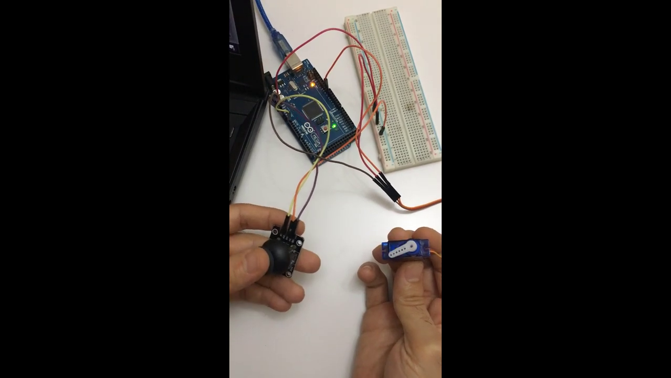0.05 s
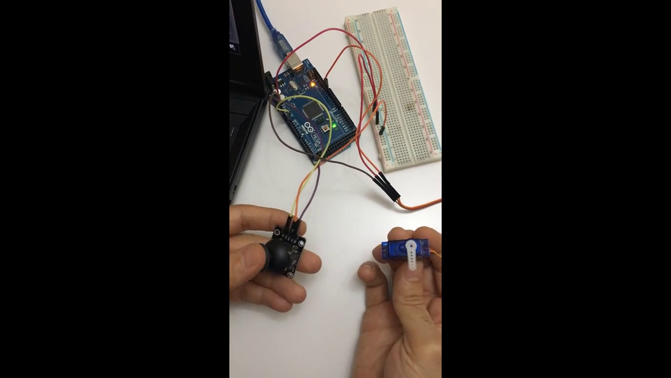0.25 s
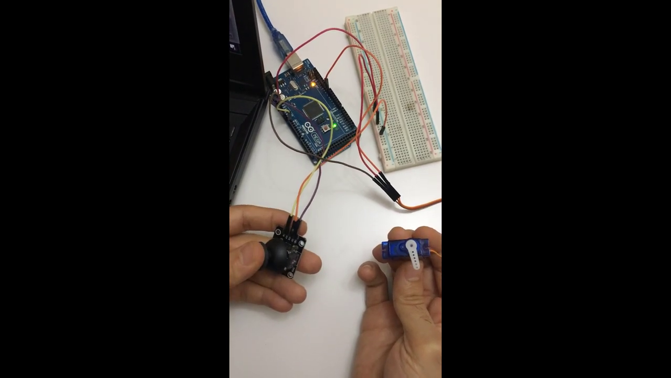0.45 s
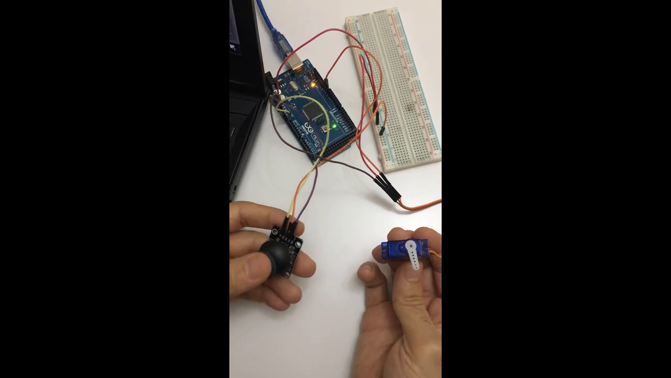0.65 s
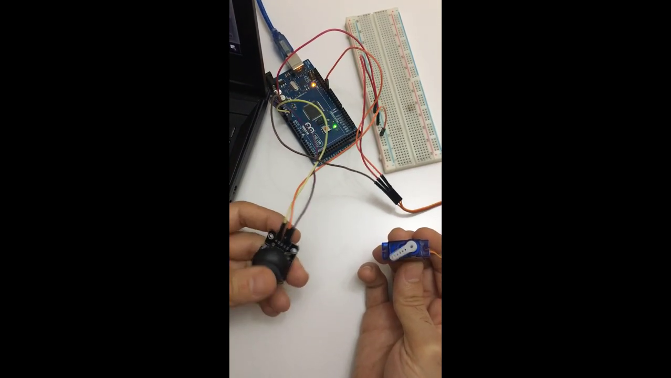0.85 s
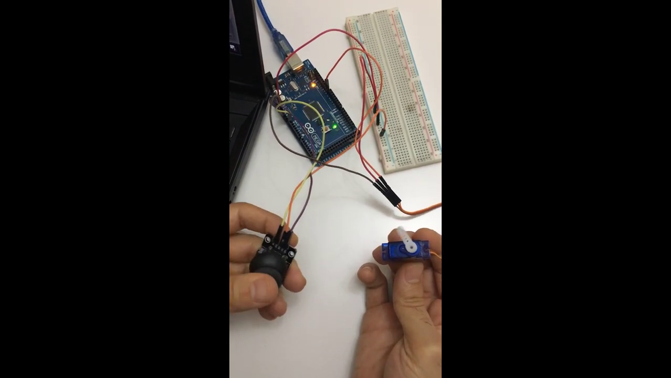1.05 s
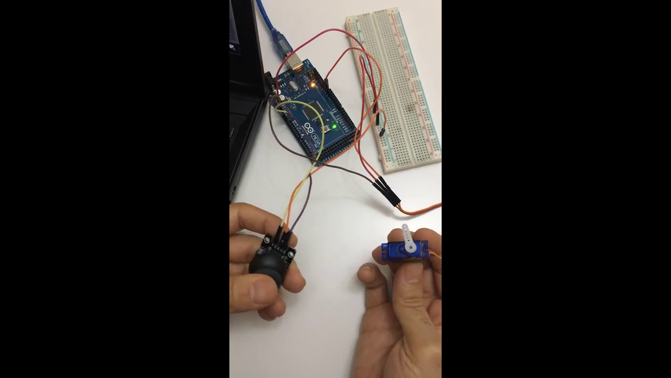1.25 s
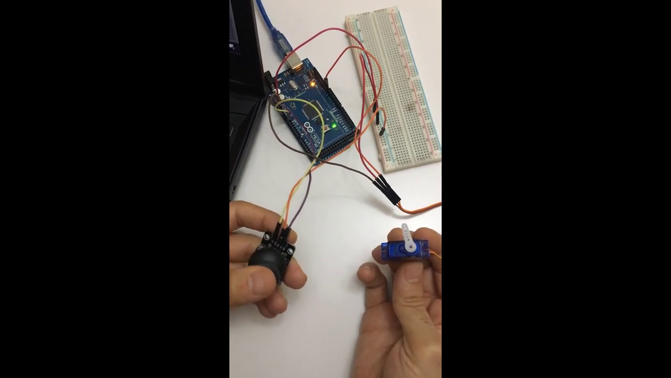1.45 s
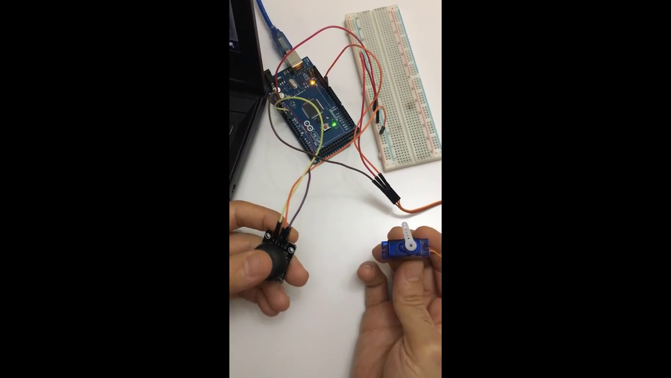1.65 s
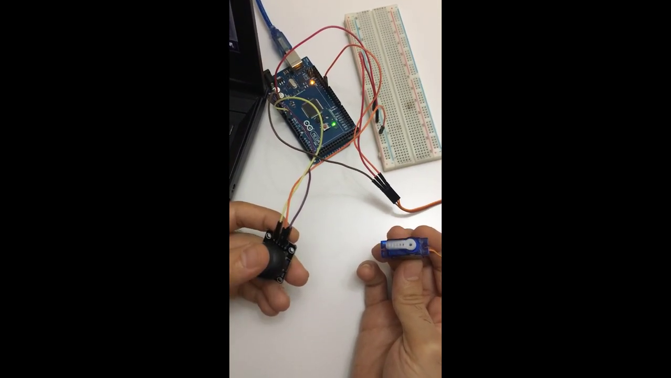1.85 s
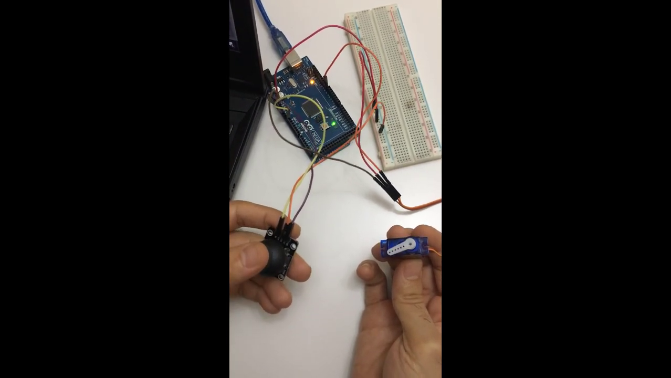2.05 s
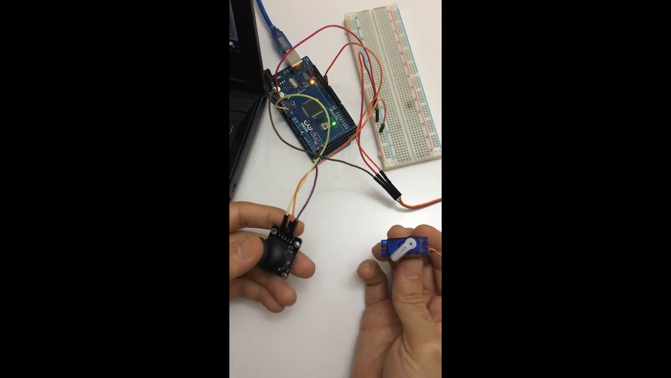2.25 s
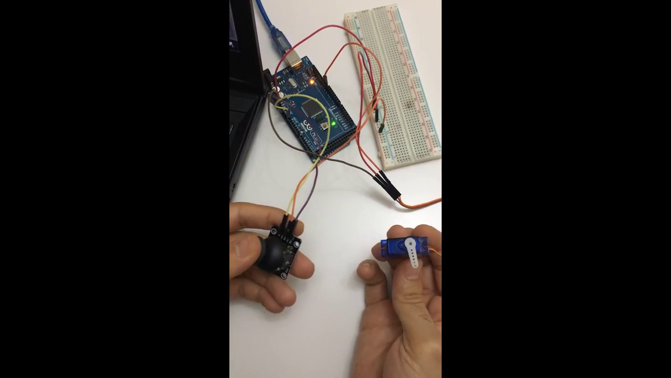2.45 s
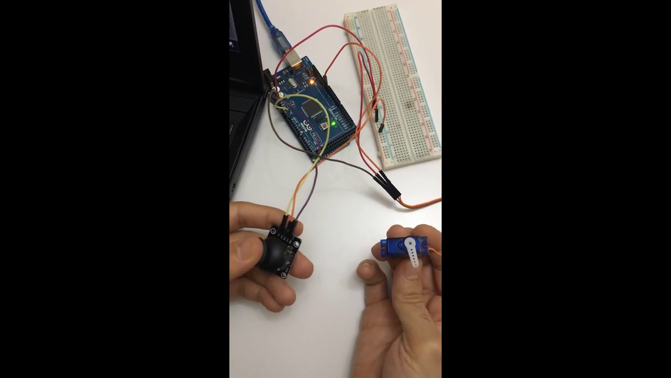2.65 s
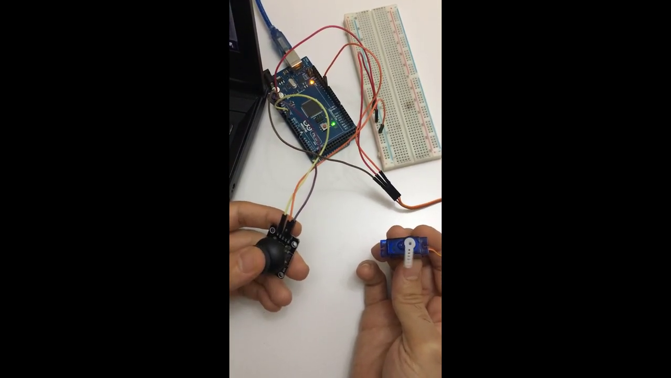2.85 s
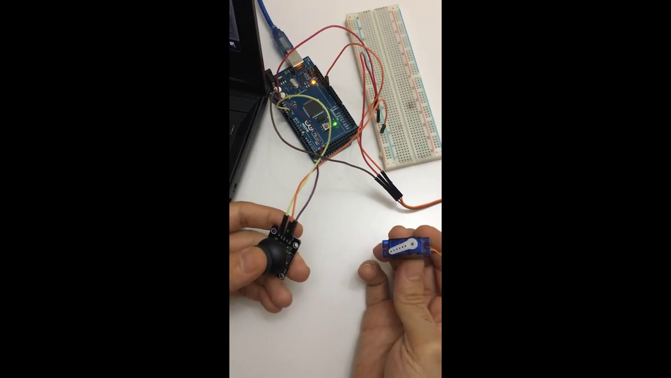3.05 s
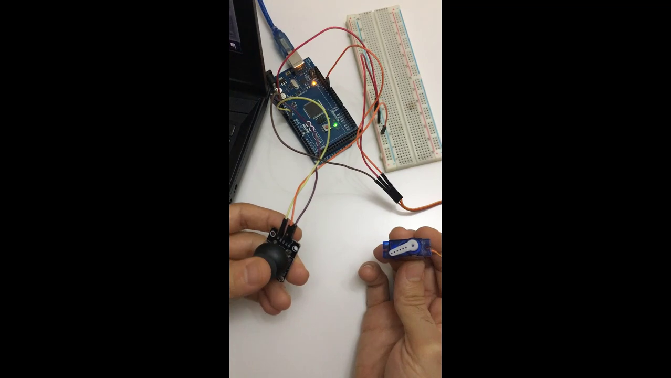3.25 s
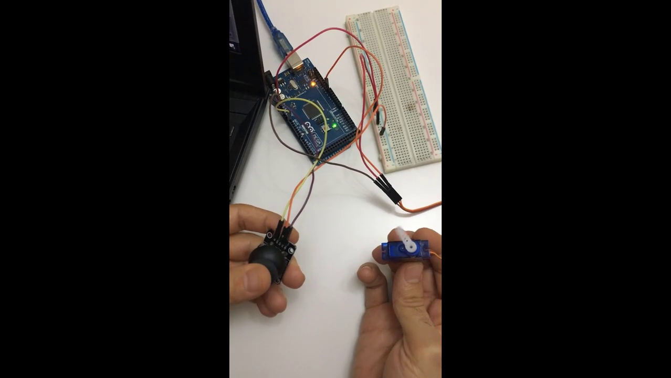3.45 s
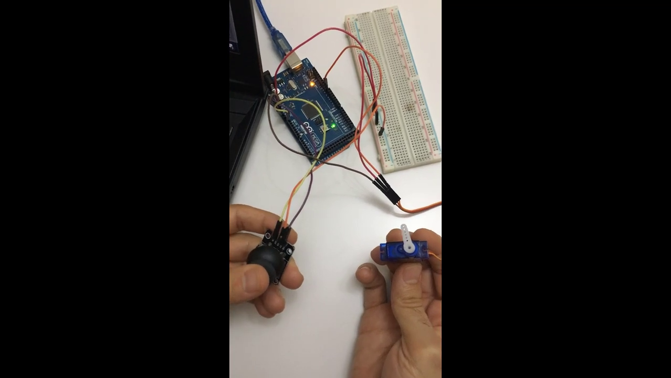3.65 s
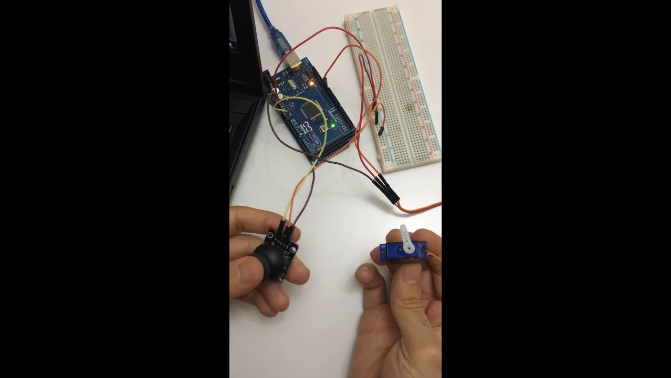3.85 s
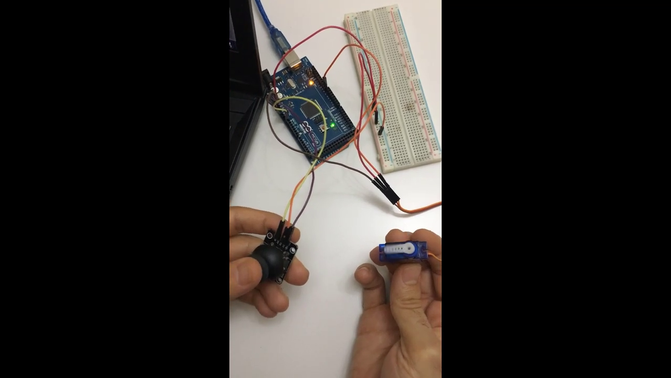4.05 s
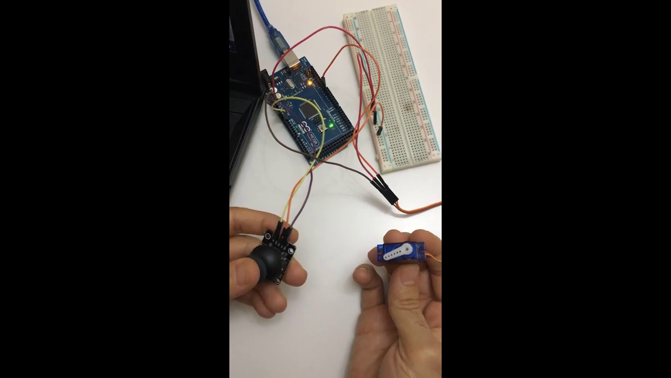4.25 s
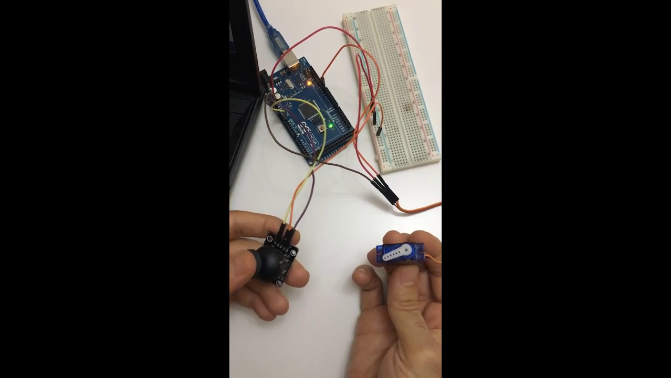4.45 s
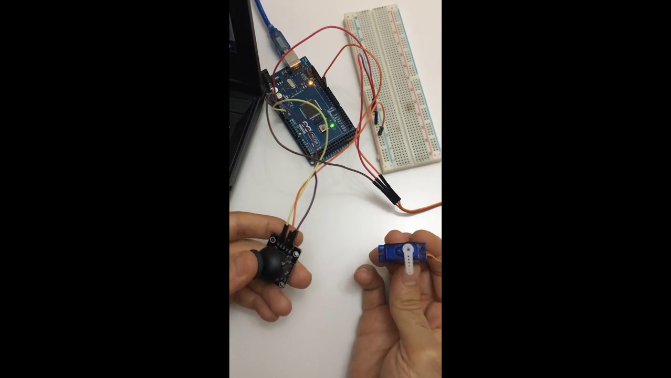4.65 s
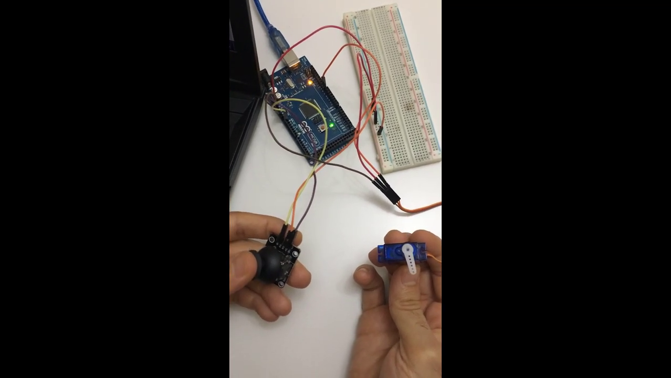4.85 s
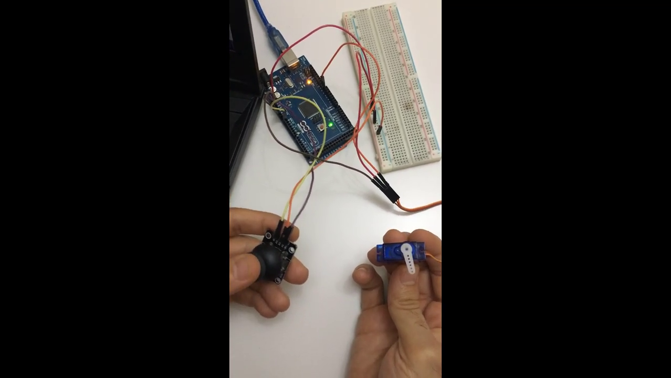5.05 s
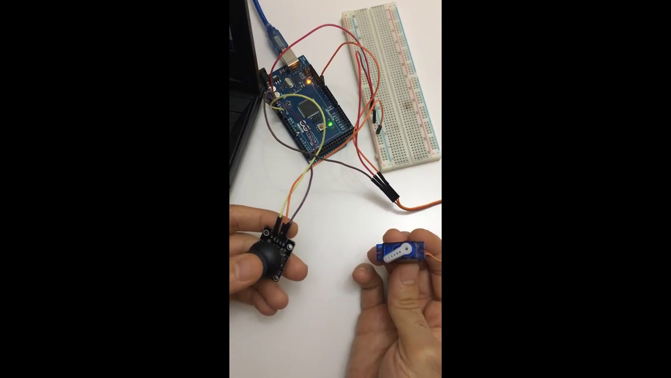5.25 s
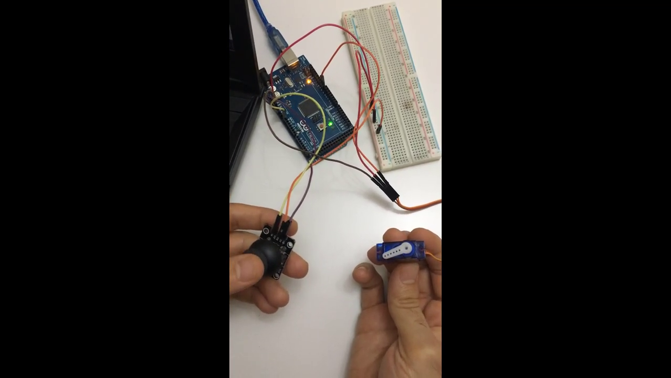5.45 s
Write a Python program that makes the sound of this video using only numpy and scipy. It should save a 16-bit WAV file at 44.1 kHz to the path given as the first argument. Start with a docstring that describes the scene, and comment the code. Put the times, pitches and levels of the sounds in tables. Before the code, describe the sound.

Close to the microphone, a small hand-held servo makes eleven brief raspy whirrs, each about a fifth of a second, starting quickly and braking to a stop. Some carry a thin whine, others rattle more. Faint ticks trail each move, and a few dry joystick clicks snap between. Small quiet room, with soft hum and low rumble behind.

```python
"""Hobby servo under a joystick, close by

A small servo, held in a hand over a desk close to the microphone, swings back and forth in a small, quiet room.
Each swing spins up, brakes and stops: the plastic gears scrape and knock twice a motor turn; clockwise a thin
whine stands out, anticlockwise the teeth rattle more. After each swing it ticks on its 50 Hz control pulses.
One gear snap and then the joystick click, dry snaps that ring briefly; behind are room air, mains-like hum with
a faint buzz of the servo's control pulses, a low rumble and, late on, a far motor."""
import sys
import numpy as np
from scipy import signal
from scipy.fft import rfft, irfft
from scipy.io import wavfile

SR = 44100
rng = np.random.default_rng(int(sys.argv[2]) if len(sys.argv) > 2 else 0)


def int16_out(signal):
    """Quantize to a 16-bit WAV file."""
    q = np.round(np.clip(np.atleast_2d(signal).T, -1, 1) * 32767)
    wavfile.write(sys.argv[1], SR, q.astype(np.int16))


N = 242991
T = np.arange(N) / SR  # time in seconds

# Swings of the servo in the hand. Each row: start in seconds, start of braking in seconds, rest in seconds,
# way of turning, gear level in dB, change of level by the end of braking in dB, scrape over knocks in dB.
SWINGS = [(-.1, 0.017, 0.13, "anticlockwise", -44, -9.5, 1),
          (0.202, 0.291, 0.42, "anticlockwise", -45.5, -13.5, -6),
          (.799, 0.895, 0.99, "clockwise", -45.5, 5.5, -4), (0.998, 1.112, 1.199, "clockwise", -44, 6, 0),
          (1.798, 1.923, 2.058, "anticlockwise", -44.5, -14.5, -6),
          (2.3, 2.386, 2.502, "anticlockwise", -45.5, -7, -3.5),
          (2.9, 2.993, 3.097, "clockwise", -44.5, 0, -5.5),
          (3.4, 3.522, 3.615, "clockwise", -43.5, 4.5, 0.5),
          (4.001, 4.124, 4.23, "anticlockwise", -43.5, -2, -2),
          (4.6, 4.692, 4.8, "anticlockwise", -44, -4, -7),
          (5.199, 5.298, 5.39, "clockwise", -43.5, 3.5, -5.5)]
# Each way of turning: whine in dB, pinion tone in dB, low body of the case at full speed in dB, rattle in dB.
WAYS = {"clockwise": (-61.5, -64.5, 1, -43.5), "anticlockwise": (-67.5, -61, -1.5, -38.5)}
# The hardest snaps of gear teeth across their play. Each row: time in seconds, level before SNAP_TRIM_DB in dB.
SNAPS = [(0.0094, -26.5), (0.0237, -26.5), (0.057, -28.5), (0.3287, -26), (1.0518, -29), (1.1916, -25.5),
         (1.1977, -30), (1.8163, -28.5), (1.8519, -28.5), (1.8869, -26), (1.9467, -23.5), (1.9579, -24.5),
         (1.9639, -27.5), (2.3504, -30.5), (2.379, -24.5), (2.4048, -24.5), (2.4141, -23), (2.4251, -25.5),
         (3.0394, -27), (3.0569, -30), (3.5913, -26.5), (3.5984, -27.5), (4.0155, -27.5), (4.0218, -33),
         (4.0764, -24.5), (4.0829, -28), (4.127, -25), (4.1501, -22.5), (4.1736, -27), (4.6317, -31.5),
         (4.6578, -27.5)]
# The strongest control pulses that nudge the motor. Each row: time in seconds, level before NUDGE_TRIM_DB in dB.
NUDGES = [(0.5417, -55), (1.3796, -52.5), (2.0401, -51), (2.2052, -52), (2.2593, -51.5), (2.5616, -46),
          (3.22, -55), (3.7783, -51.5), (4.3415, -48.5), (4.8404, -51)]
# Colour of the gear case. Each row: frequency in Hz, relative level in dB.
CASE_COLOUR = [(500, -42), (1000, -30.5), (1700, -20), (2400, -15), (3000, -17), (4200, -9), (4900, -15),
               (6200, -4), (7500, -5.5), (9500, -3), (10800, -6), (12600, -4.5), (14300, -12.5),
               (16000, -9.5)]
# Sharper resonances of the case. Each row: frequency in Hz, width in Hz, lift in dB.
CASE_MODES = [(2430, 580, 6.5), (3174, 200, 7.5), (3537, 144, 7), (4130, 280, 4), (5265, 190, 7),
              (6334, 200, 6.5), (6950, 285, 7), (8494, 360, 7), (9050, 114, 4), (9340, 380, 5.5),
              (9810, 224, 7), (11630, 260, -1), (12170, 270, 4.5), (14550, 260, 6.5), (16200, 150, 13)]
# Decay of the small room. Each row: frequency in Hz, time to fall 60 dB in seconds.
ROOM_DECAY = [(300, 0.38), (2000, 0.32), (4500, 0.3), (9000, 0.17), (15000, 0.16)]
# Colour of the room air. Each row: frequency in Hz, relative level in dB.
AIR_COLOUR = [(15, -45), (25, -28), (44, -6.5), (108, -7.5), (134, -13), (175, -12), (293, -17),
              (480, -21.5), (1100, -27), (2550, -30.5), (6000, -34.5), (11300, -36), (15000, -41.5),
              (16000, -54)]
# Steady low tones: hum in the room at 58, 100 and 300 Hz, and a buzz of the servo's 50 Hz control pulses near
# 150, 200 and 250 Hz. Each row: frequency in Hz, level in dB.
HUM = [(58, -81.5), (100, -74), (150, -86), (200, -96), (247, -92.5), (300, -84.5)]
# Clicks close by: the first, at .251, is a snap of the gears heard through the case, the rest are the joystick.
# Each row: time in seconds, snap level in dB, lower edge of the click in Hz, upper edge in Hz,
# pitch of the ring in Hz, ring level in dB.
CLICKS = [(.251, -35, 5960, 12000, 2320, -43), (.970, -38, 1680, 6900, 2530, -48),
          (1.469, -36.5, 4930, 12400, 5330, -46.5), (2.285, -53.5, 4497, 7400, 2720, -62.5),
          (3.861, -37, 4900, 12100, 5210, -44), (3.897, -41, 4600, 8900, 1950, -45.5),
          (4.576, -57.5, 4400, 8500, 2850, -68)]
# A far motor that swells. Each row: time in seconds, pitch in Hz, level in dB.
FAR_MOTOR = [(4.0, 52, -100), (4.5, 54.03, -79), (4.95, 53.85, -74), (5.15, 55.3, -69.5),
             (5.4, 58.08, -69.5), (5.51, 60.1, -74)]
# Harmonics of the far motor. Each row: multiple of its pitch, relative level in dB.
FAR_MOTOR_ORDERS = [(1, 0), (2, 0), (3, -13.5), (4, -8.5)]

TOP_HZ, SPIN_UP_S = 222.76, 0.033  # free speed of the motor shaft, and its time constant
PULSE_HZ = 50  # control pulses
TAKE_UP_S, TAKE_UP_DB = 0.0065, -49.5  # delay and level of the knock as the gears take up their slack
RATTLE_PER_S, RATTLE_SPREAD_DB = 40, 2.5  # small snaps of loose teeth while the gears turn
SNAP_TRIM_DB, NUDGE_TRIM_DB = -5, -5
HUNT_S, HUNT_DB, HUNT_FADE_DB_PER_S = 0.25, -66.5, -27  # the servo hunts for its position after a swing
AIR_DB = -71
RUMBLE_DB, RUMBLE_RISE_DB_PER_S = -83.5, 1.67  # level at the start, and how it grows
EDGE_HZ = 15700  # upper limit of the recorder


def amp(db):
    """Decibels to amplitude."""
    return 10 ** (np.asarray(db) / 20)


def evened(x):
    """Scales a sound to an RMS of one."""
    return x / np.sqrt(np.mean(x ** 2) + 1e-20)


def read(points, hz):
    """Reads a table of frequency and value along a logarithmic frequency scale."""
    f, value = np.transpose(points)
    return np.interp(np.log(hz + 1), np.log(f + 1), value)


def add(mix, s, sound):
    """Lays a sound into the mix at s seconds, cut off at both ends of the mix."""
    start = round(s * SR)
    sound = sound[max(-start, 0):]
    part = mix[max(start, 0):][:len(sound)]
    part += sound[:len(part)]


def wander(size, hz):
    """Chance of unit spread: random values, hz of them a second, joined by straight lines."""
    knots = np.arange(size) * hz / SR
    return np.interp(knots, np.arange(4096), rng.standard_normal(4096))


def one_ms(x):
    """Scales a click to the energy of one millisecond at full level."""
    return x * np.sqrt(SR * 1e-3 / np.sum(x ** 2))


def burst(decay_s, rise_s=0.00013, size=500):
    """A contact: a puff of micro-impacts that builds and dies within milliseconds."""
    t = T[:size]
    envelope = (1 - np.exp(-t / rise_s)) * np.exp(-t / decay_s)
    return one_ms(rng.standard_normal(size) * envelope)


def ring(hz, t60, size=1500):
    """One damped mode, which falls 60 dB in t60 seconds."""
    t = T[:size]
    return one_ms(np.sin(2 * np.pi * hz * t) * np.exp(-np.log(1000) * t / t60))


def shelf(x, hz, db):
    """Changes the level of what lies below hz."""
    low = signal.sosfiltfilt(signal.butter(2, hz, fs=SR, output="sos"), x)
    return x + (amp(db) - 1) * low


def band(x, low_hz, high_hz):
    """A steep lower edge and a gentle upper one."""
    x = signal.sosfilt(signal.butter(4, low_hz, "high", fs=SR, output="sos"), x)
    return signal.sosfilt(signal.butter(2, high_hz, fs=SR, output="sos"), x)


def tooth_knocks(turns, jitter_s=0.00015, uneven_db=2.5, knock_s=0.00099, rise_s=0.00029):
    """Twice a turn the teeth take up their play, never quite alike."""
    knocks = np.zeros(len(turns))
    for at in np.flatnonzero(np.diff(np.floor(2 * turns))):
        late, force = rng.standard_normal(2)
        add(knocks, at / SR + jitter_s * late, amp(uneven_db * force) * burst(knock_s, rise_s))
    return evened(knocks)


def gear_noise(turns, speed, braking, gear_db, brake_db, scrape_db, grit_db=3, force_power=1.0,
               scrape_power=0.55):
    """Knocks of the teeth, and brushes and sliding teeth that scrape; both weaken as the speed falls."""
    scrape = evened(rng.standard_normal(len(turns)) * amp(grit_db * wander(len(turns), 900)))
    gears = tooth_knocks(turns) * speed ** force_power
    gears += amp(scrape_db) * scrape * speed ** scrape_power
    level = amp(gear_db + brake_db * braking ** 1.28)
    return gears * level / np.hypot(1, amp(scrape_db))


def motor_whine(turns, speed, braking, whine_db, pinion_db, whine_power=6, flutter=0.25):
    """Cogging whines six times a turn; the pinion sings at eighteen and fades as the drive eases off."""
    cogging = amp(whine_db) * speed ** whine_power * np.sin(2 * np.pi * 6 * turns)
    drive = speed ** 2 * (1 - braking) * (1 + flutter * wander(len(turns), 200))
    pinion = amp(pinion_db) * drive * np.sin(2 * np.pi * 18 * turns)
    return cogging + pinion


def swing(start, brake, rest, gear_db, brake_db, scrape_db, whine_db, pinion_db, brake_power=2.4):
    """One move: speed sets the rate and force of the knocks, the scraping, and the pitch of the whine."""
    t = np.arange(start, rest, 1 / SR)
    braking = np.clip((t - brake) / (rest - brake), 0, 1)
    speed = (1 - np.exp(-(t - start) / SPIN_UP_S)) * (1 - braking ** brake_power)
    # the drive is chopped near the goal
    speed *= 1 + 0.035 * np.minimum(4 * braking, 1) * np.sin(2 * np.pi * PULSE_HZ * t)
    turns = np.cumsum(speed * TOP_HZ) / SR
    gears = gear_noise(turns, speed, braking, gear_db, brake_db, scrape_db)
    return speed, gears, motor_whine(turns, speed, braking, whine_db, pinion_db)


def snap(db, decay_s=0.002, body_hz=4000, body_db=-2):
    """A tooth jumps across its play and strikes the next."""
    return amp(db) * shelf(burst(decay_s), body_hz, body_db)


def rattle(speed, db, speed_power=1.33, count=12):
    """Loose teeth snap at uneven intervals, harder the faster the gears turn."""
    out = np.zeros(len(speed))
    for k in range(count):
        force_db = db + RATTLE_SPREAD_DB * rng.standard_normal()
        add(out, (k + rng.random()) / RATTLE_PER_S, snap(force_db))
    return out * speed ** speed_power


def hunting(spread_db=6.5, ring_hz=4200, ring_db=-7, count=14):
    """After each swing, control pulses twitch the motor, ever fainter on the whole: contacts, and its can rings."""
    contacts, can = np.zeros((2, N))
    for _, _, rest, *_ in SWINGS:
        for s in (np.ceil(rest * PULSE_HZ) + np.arange(count)) / PULSE_HZ:
            force_db = HUNT_DB + HUNT_FADE_DB_PER_S * (s - rest) + spread_db * rng.standard_normal()
            force = (s - rest < HUNT_S) * amp(force_db)
            add(contacts, s, force * burst(0.0023))
            add(can, s, force * amp(ring_db) * ring(ring_hz * rng.uniform(0.94, 1.04), 0.019))
    return contacts, can


def case(x, size=4096):
    """The plastic gear case colours every contact and rings briefly after it."""
    hz = abs(np.fft.fftfreq(size, 1 / SR))
    db = read(CASE_COLOUR, hz)
    for mode_hz, width, lift in CASE_MODES:
        db = db + lift / (1 + (2 * (hz - mode_hz) / width) ** 2)
    # minimum phase: the case answers at once and then rings
    log_response = np.conj(signal.hilbert(np.log(evened(amp(db)))))
    response = np.fft.ifft(np.exp(log_response)).real
    return signal.oaconvolve(x, response[:size // 2])[:N]


def servo(nudge_s=0.0014, body_hz=4000, idle_body_db=-5):
    """These contacts sound through the one case, its low body following speed; whine and can ring bypass it."""
    contacts, tones = hunting()
    body_db = np.full(N, float(idle_body_db))
    for start, brake, rest, way, gear_db, brake_db, scrape_db in SWINGS:
        whine_db, pinion_db, swing_body_db, rattle_db = WAYS[way]
        speed, gears, whine = swing(start, brake, rest, gear_db, brake_db, scrape_db, whine_db, pinion_db)
        add(contacts, start + TAKE_UP_S, snap(TAKE_UP_DB))
        add(contacts, start, gears + rattle(speed, rattle_db))
        add(tones, start, whine)
        add(body_db, start, speed * (swing_body_db - idle_body_db))
    for s, db in SNAPS:
        add(contacts, s, snap(db + SNAP_TRIM_DB))
    for s, db in NUDGES:
        add(contacts, s, amp(db + NUDGE_TRIM_DB) * burst(nudge_s))
    return case(shelf(contacts, body_hz, body_db)) + tones


def room(x, wet_db=-14, echo_s=0.0088, echo_db=-21, size=22050):
    """One near reflection, then a short diffuse tail that fades at its own rate in each band."""
    taps = rng.standard_normal(size) * (rng.random(size) < 0.15) * (T[:size] > echo_s)
    hz, t, z = signal.stft(taps, SR, nperseg=256)
    decay = np.exp(-np.log(1000) * t / read(ROOM_DECAY, hz)[:, None])
    tail = signal.istft(z * decay, SR, nperseg=256)[1]
    tail *= amp(wet_db) / np.linalg.norm(tail)
    add(tail, echo_s, amp([echo_db]))
    return signal.fftconvolve(x, tail)[:N]


def room_air():
    """Steady noise with the colour of the room's air."""
    spectrum = rfft(rng.standard_normal(N)) * amp(read(AIR_COLOUR, np.fft.rfftfreq(N, 1 / SR)))
    return amp(AIR_DB) * evened(irfft(spectrum, N))


def electrical_hum(waver=0.45):
    """Low tones that waver in level and drift in phase."""
    hum = np.zeros(N)
    for hz, db in HUM:
        level = amp(db) * (1 + waver * wander(N, 12))
        hum += level * np.sin(2 * np.pi * hz * T + 0.5 * wander(N, 5))
    return np.sqrt(2) * hum


def building_rumble():
    """Low rumble of the building: band-limited noise that slowly rises."""
    noise = evened(band(rng.standard_normal(N), 38, 220))
    return noise * amp(RUMBLE_DB + RUMBLE_RISE_DB_PER_S * T)


def clicks(snap_s=0.0014, ring_t60=0.0079, pair_spread=0.063, pair_db=-2, bounce_s=0.00083):
    """A gear snap, then joystick clicks: each a dry snap, and a close pair of plastic modes as the part bounces."""
    out = np.zeros(N)
    for s, db, low_hz, high_hz, ring_hz, ring_db in CLICKS:
        add(out, s, amp(db) * one_ms(band(burst(snap_s), low_hz, high_hz)))
        body = ring(ring_hz * (1 + pair_spread / 2), ring_t60)
        add(body, bounce_s, amp(pair_db) * ring(ring_hz * (1 - pair_spread), ring_t60))
        add(out, s, amp(ring_db) * one_ms(band(body, 0.72 * ring_hz, high_hz)))
    return out


def low_swell(at_s=2.51, length_s=0.061, hz=205, db=-68):
    """One brief, soft low tone that swells and fades, its phase unsteady."""
    envelope = np.exp(-((T - at_s) / length_s) ** 2)
    return amp(db) * np.sqrt(2) * envelope * np.sin(2 * np.pi * hz * T + wander(N, 40))


def far_motor():
    """A distant motor: harmonics of one gliding shaft pitch, swelling in level."""
    s, hz, db = np.transpose(FAR_MOTOR)
    turns = np.cumsum(np.interp(T, s, hz)) / SR
    tone = sum(amp(level) * np.sin(2 * np.pi * k * turns) for k, level in FAR_MOTOR_ORDERS)
    return np.sqrt(2) * amp(np.interp(T, s, db)) * tone


def scene(shade_hz=6500, shade_db=-7):
    """Servo and clicks close by in a quiet room; the hand keeps the clicks' lower tones from the walls."""
    motor, click = servo(), clicks()
    reflected = room(motor + shelf(click, shade_hz, shade_db))
    behind = room_air() + electrical_hum() + building_rumble() + low_swell() + far_motor()
    return (motor + click + reflected + behind)[None]


def record(dry):
    """The recorder's band limit."""
    lowpass = signal.firwin(401, EDGE_HZ, window=("kaiser", 8), fs=SR)
    return signal.oaconvolve(dry, lowpass[None], "same")


dry = scene()
out = record(dry)
int16_out(out)
```